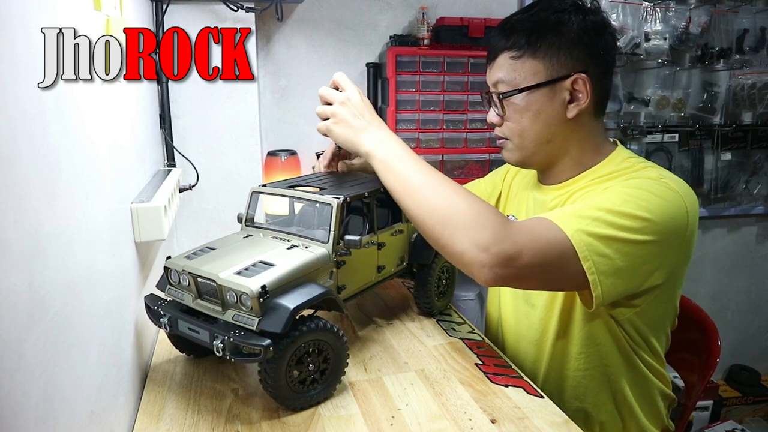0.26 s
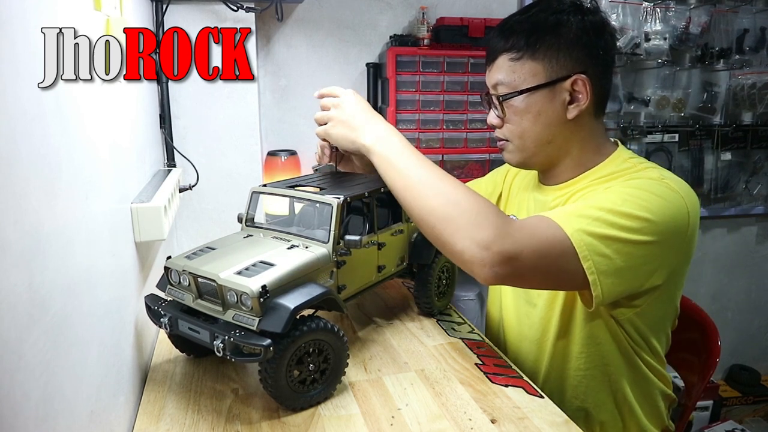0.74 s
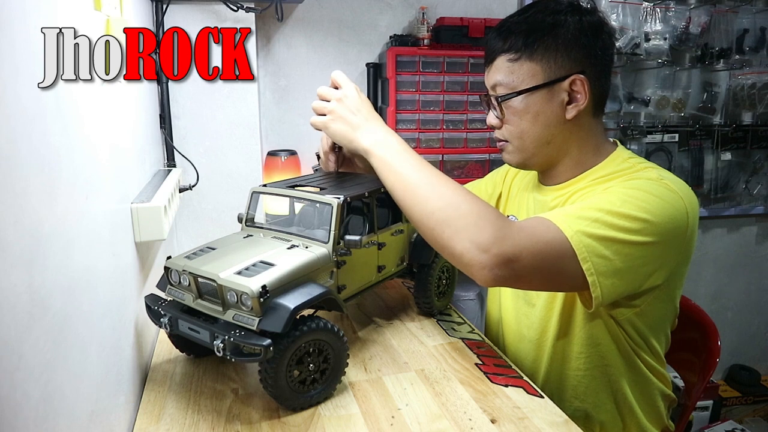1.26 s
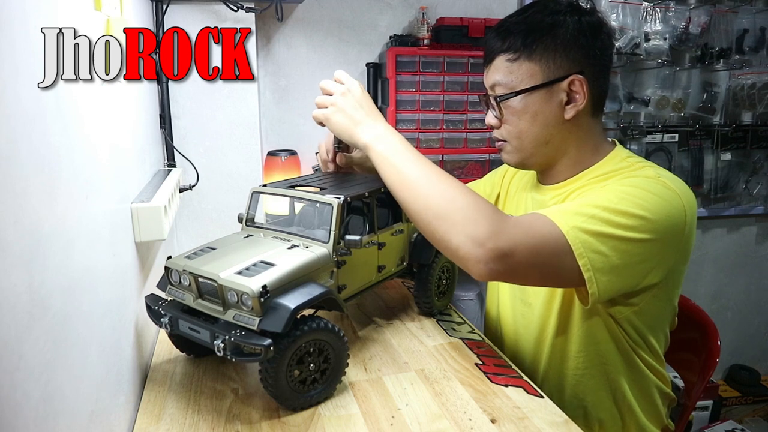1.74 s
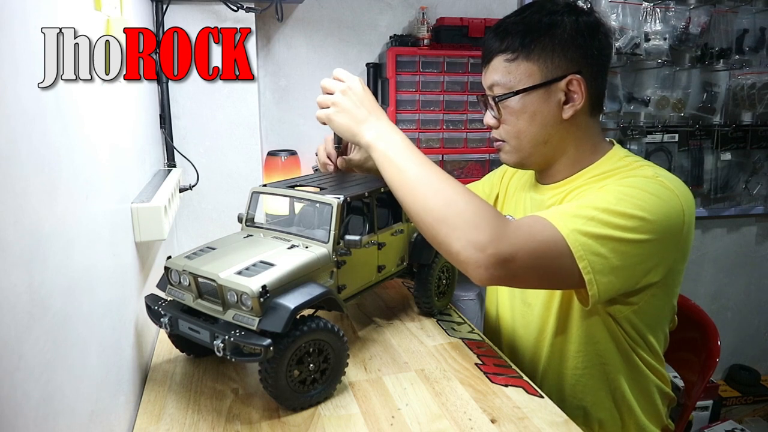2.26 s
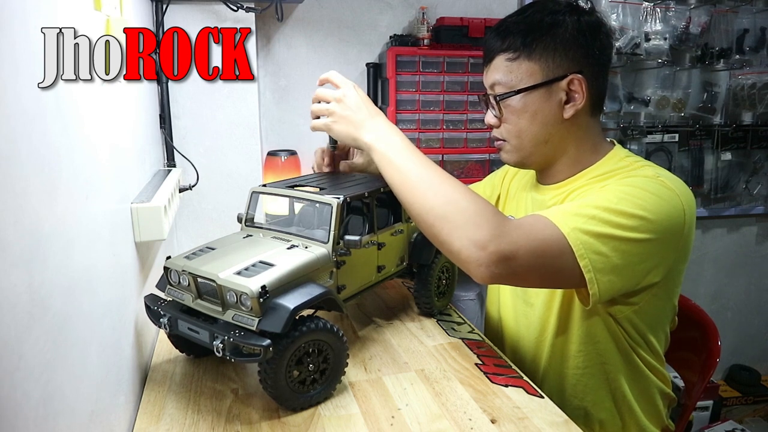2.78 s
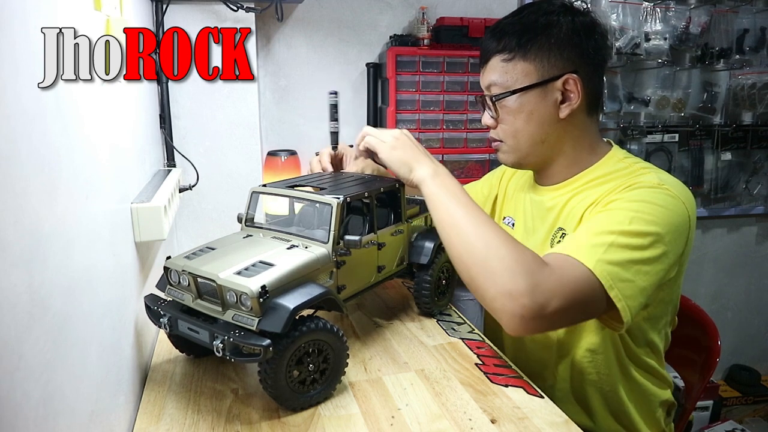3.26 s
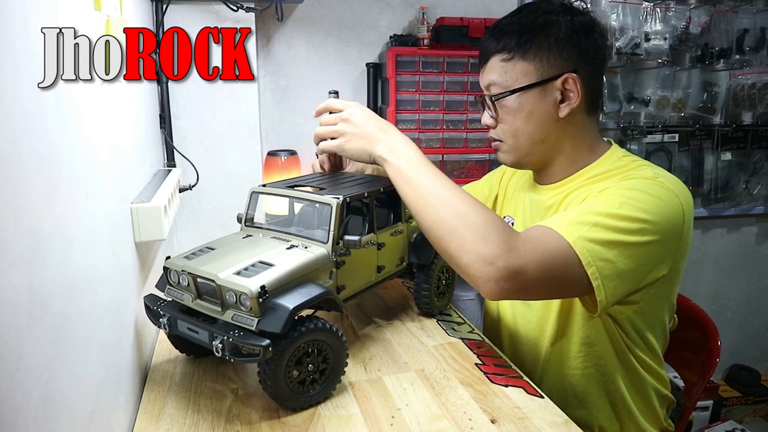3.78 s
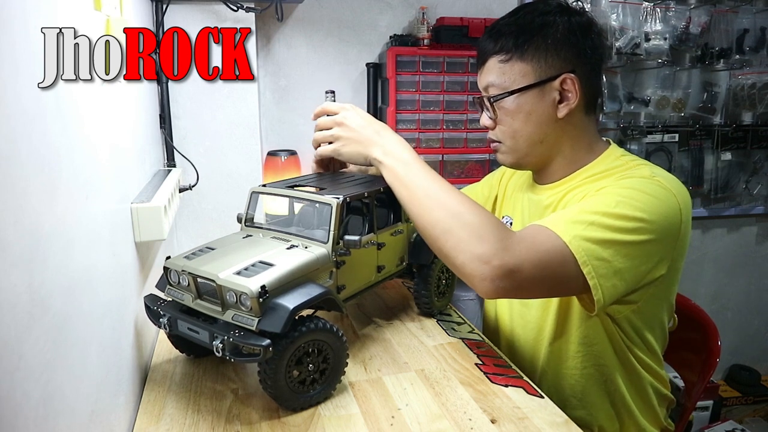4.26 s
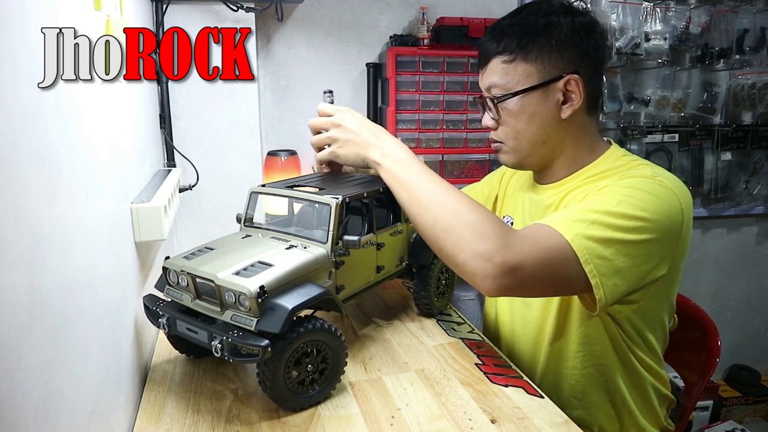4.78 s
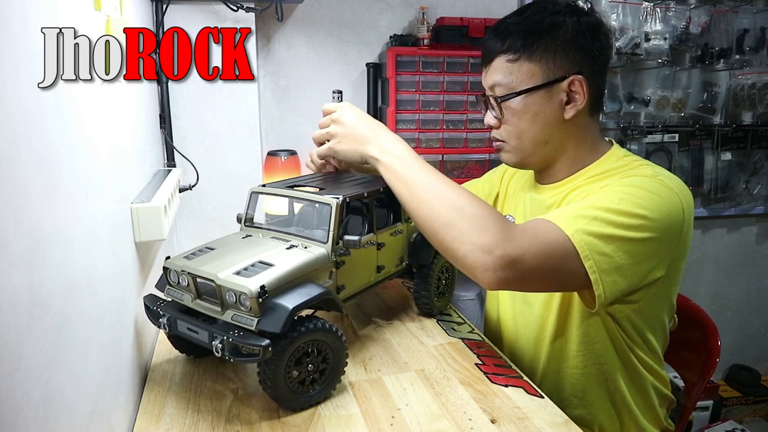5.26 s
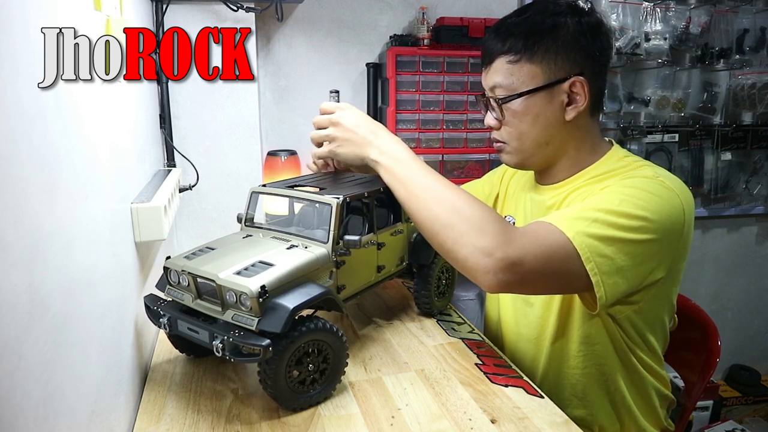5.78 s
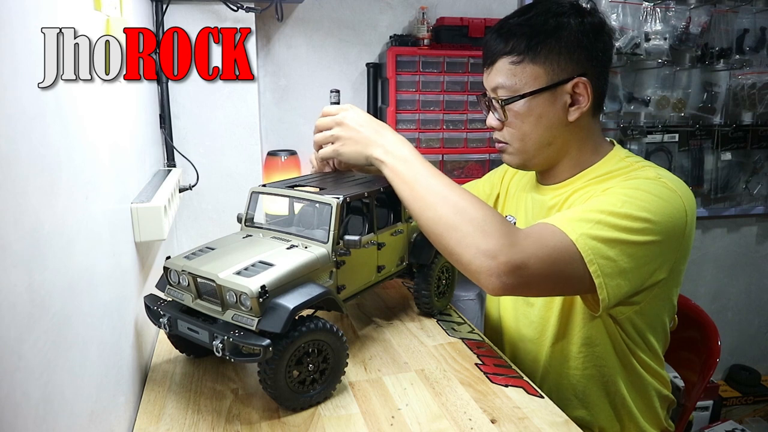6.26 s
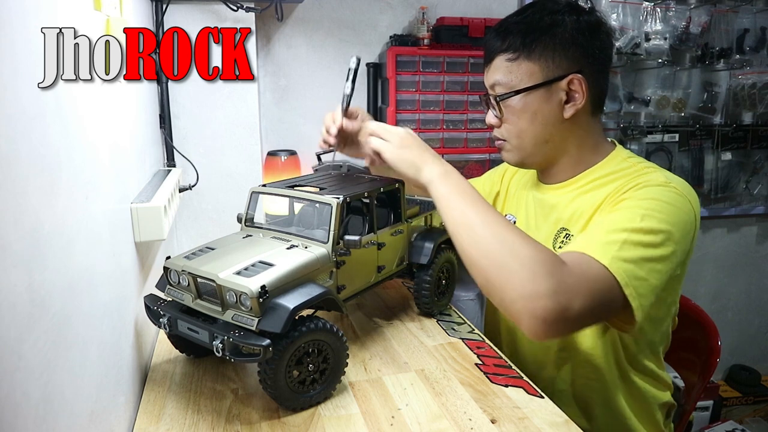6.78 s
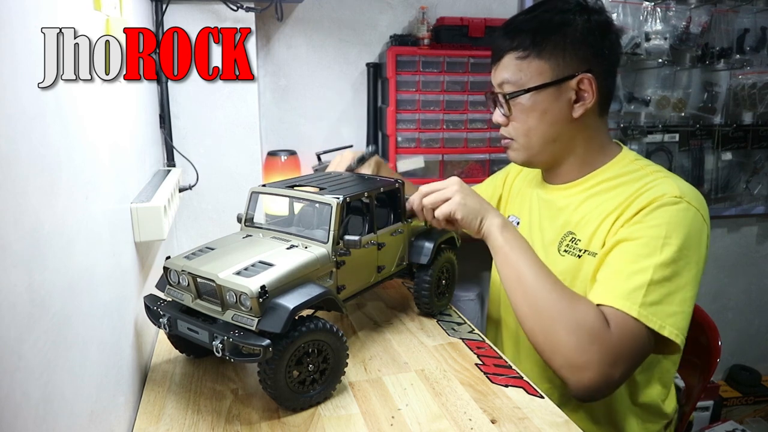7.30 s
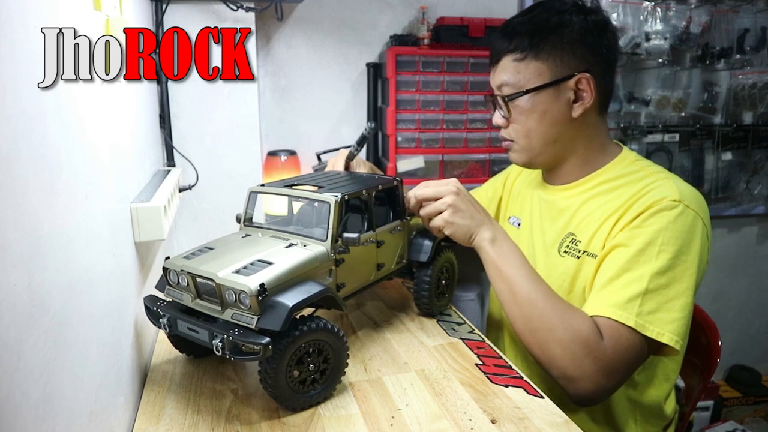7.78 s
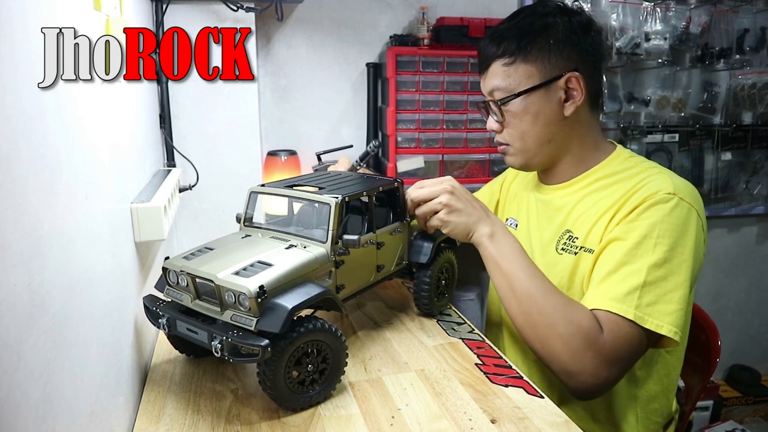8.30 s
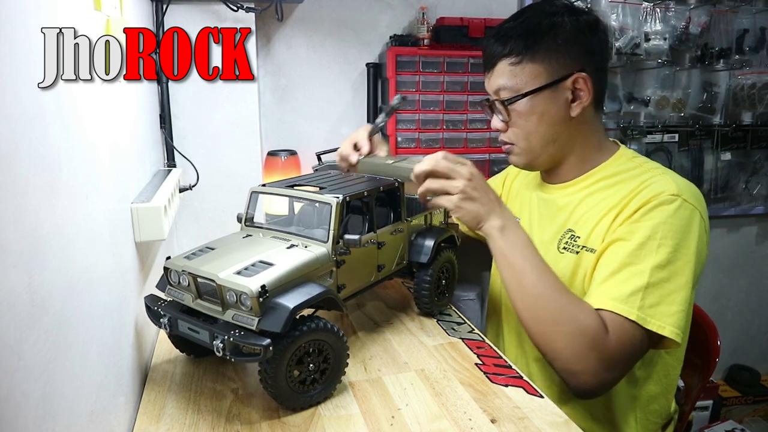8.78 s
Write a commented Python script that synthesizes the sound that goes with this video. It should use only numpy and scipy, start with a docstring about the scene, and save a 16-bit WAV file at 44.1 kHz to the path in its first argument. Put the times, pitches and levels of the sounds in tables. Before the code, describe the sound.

A close stereo microphone in a small workshop hears a screwdriver working on a hollow plastic model car, over faint low air rumble and wavering hum. A snap comes at 0.3 seconds, a stronger crack at 0.8, with slight rubs and taps until another snap at 2.1. A tight cluster of cracks bursts at 2.7, softer ones at 3.3, then a dry pair at 4.2. Faint steel ticks and hollow knocks lead to the loudest snap at 5.5, sharp and bright with a brief panel buzz. Another hard crack lands at 6.0, followed by weaker snaps at 6.1 and 6.5 and tiny ticks until 6.7. At 7.1 a hand bumps the car dully. A thin metal bracket clinks and scrapes around 7.6, lightly at 8.0, and sharply again at 8.4, with one faint touch near 8.9. Fingers rustle softly throughout; reflections are short.

```python
"""A small screwdriver works screws out of the plastic shell of a model car: friction grinds, then a snap and crack.
The bit ticks on screw heads and a light metal bracket clinks and slides: blows that set decaying modes ringing.
The shell knocks hollowly, fingers tap, rub and rustle as filtered noise, and a hand bumps the car.
Behind, a small room reflects it all over shaped air noise and a wavering hum; a limiter ducks after the
hardest snaps."""
import sys
import numpy as np
from scipy import signal
from scipy.fft import rfft, irfft, next_fast_len
from scipy.io import wavfile

SR = 44100
rng = np.random.default_rng(int(sys.argv[2]) if len(sys.argv) > 2 else 0)


def materialize(psi):
    """Save the field psi as 16-bit PCM at rate SR to the path in sys.argv[1].

    A 1-D psi becomes a single channel; in a 2-D psi each row is a channel.
    """
    bounded = np.clip(np.atleast_2d(psi).T, -1, 1)
    quanta = np.round(bounded * 32767).astype(np.int16)
    wavfile.write(sys.argv[1], SR, quanta)


N = 398653
EVENT_S = np.arange(SR // 2) / SR  # time axis of one event


def amp(db):
    """Decibels to gain."""
    return 10 ** (np.asarray(db) / 20)


def add(mix, s, sound):
    """Mixes a sound in at a time, cut at the end of the mix."""
    part = mix[..., round(s * SR):][..., :sound.shape[-1]]
    part += sound[..., :part.shape[-1]]


# Screws snapping loose. Each row: time in s, level in dB, treble against middle in dB, strongest body mode in Hz,
# struck panel's ring in Hz, tip crack in dB, grinding before the snap in s, final grinding level in dB,
# roof buzz in dB. Levels are before the mix gains, here and below.
SNAPS = [(0.266, -18, -12, 490, 3160, -35, 0.01, -23, -44.5),
         (0.7843, -25, -6.5, 493, 1890, -31, 0.003, -38, -54),
         (0.792, -15.5, -12, 360, 1760, -28.5, 0.004, -30, -50),
         (2.081, -24.5, -6, 610, 1500, -34, 0.0054, -41, -46),
         (2.671, -20.5, -17.5, 580, 1970, -38, 0.026, -31, -46.5),
         (2.708, -20.5, -8.5, 450, 2900, -27, 0.012, -32.5, -41.5),
         (2.769, -14, -5, 546, 3380, -20, 0.042, -26, -36.5),
         (3.296, -29.5, -1.5, 577, 1640, -37.5, 0.03, -38, -44),
         (3.358, -33, -13.5, 766, 1510, -61, 0.024, -44, -58),
         (4.223, -20, -15.5, 635, 2530, -38, 0.029, -37.5, -48),
         (4.246, -23.5, -14, 613, 2350, -45, 0.0082, -44, -43.5),
         (5.475, -31, -6, 610, 3050, -42, 0.033, -29, -43),
         (5.512, -3, -5, 710, 2910, -8, 0.031, -23.5, -26.5),
         (5.967, -28, -10.5, 541, 3260, -54, 0.025, -34.5, -48),
         (6.034, -11.5, -6, 630, 2460, -13.5, 0.044, -25, -28),
         (6.144, -19, -7, 574, 2220, -28.5, 0.034, -38, -39),
         (6.51, -24, -15, 526, 3200, -37.5, 0.13, -41.5, -42)]
# Loose roof panel. Each row: nominal mode in Hz, relative level in dB, t60 in s.
ROOF = [(2310, 1, 0.33), (2430, -7, 0.22), (3090, -5, 0.2), (4260, -10.5, 0.24), (4580, -9.5, 0.19),
        (6870, -15.5, 0.23)]
REBOUND_S, REBOUND_DB = 0.009, -8.5


def snaps(lead_s=0.0004, crack_room_db=-6, detune=0.012):
    """Screws break loose: the tip cracks and bounces once; the roof buzzes on, each mode's pitch varied at random."""
    out = np.zeros((2, N))
    for s, db, treble_db, body_hz, panel_hz, crack_db, _, _, roof_db in SNAPS:
        tone = hardness(db)[0], treble_db, panel_hz, body_hz
        snap = strike(db, *tone)
        add(snap, REBOUND_S, strike(db + REBOUND_DB, *tone))
        roof = [(hz * (1 + detune * rng.standard_normal()), level_db, t60_s) for hz, level_db, t60_s in ROOF]
        buzz = ring(roof, spread_db=3, flutter=1.6, flutter_s=0.0065)
        buzz = buzz * (1 - np.exp(-EVENT_S / 0.0055))
        beam_db = np.interp(db, [-25, -5], [3, 9])
        add(out, s - lead_s, beamed(snap, panel_hz, beam_db))
        add(out, s - lead_s, amp([[crack_db], [crack_db + crack_room_db]]) * crack())
        add(out, s, amp(roof_db) * buzz / attack(buzz))
    return out


CRACK_HZ, CRACK_WIDTH_HZ, CRACK_T60_S = 4845, 790, 0.025


def crack(rise_s=0.001):
    """The steel tip slips in the screw head: a short noise burst through one narrow, bright resonance."""
    burst = rng.choice([-1., 1.], len(EVENT_S)) * (1 - np.exp(-EVENT_S / rise_s))
    burst = burst * amp(-60 * EVENT_S / CRACK_T60_S)
    bite = colour(burst, hump(bins(burst), CRACK_HZ, CRACK_WIDTH_HZ))
    return bite / attack(bite)


# Blow strength to tone. Each row: level in dB, bass against middle in dB, treble against middle in dB.
HARDNESS = [(-55.5, 9.5, -17.5), (-37.5, 1.5, -16), (-17.5, -7.5, -4.5), (-3.5, -11.5, -8)]


def hardness(db):
    """A harder blow has a shorter contact, so less bass and, mostly, more treble."""
    level_db, bass_db, treble_db = np.transpose(HARDNESS)
    return np.interp(db, level_db, bass_db), np.interp(db, level_db, treble_db)


def strike(out_db, bass_db, treble_db, panel_hz, body_hz):
    """One hit on plastic; hard hits rise faster and ring the panel more."""
    rise_s = np.interp(out_db, [-50, -20], [.002, .0007])
    panel_db = np.interp(out_db, [-22, -4], [6, 15])
    return amp(out_db) * blow(bass_db, treble_db, panel_hz, body_hz, rise_s=rise_s, panel_db=panel_db)


RATTLE_HZ, RATTLE_WIDTH_HZ, RATTLE_PEAK_DB = 2335, 220, 5  # loose roof panel


def blow(bass_db, treble_db, panel_hz, body_hz=580, chatter_db=6, chatter_s=0.011, rise_s=0.00071,
         panel_db=7, body_db=7, rattle_db=-1, rattle_t60_s=.07):
    """Contact chatters for milliseconds in the modes nearest the struck spot; the whole shell rattles on briefly."""
    force = rng.choice([-1., 1.], len(EVENT_S)) * (1 - np.exp(-EVENT_S / rise_s))
    hz = bins(force)
    panel = hump(hz, panel_hz, width_hz=480)
    body = hump(hz, body_hz, width_hz=220)
    chatter_gain = amp(chatter_db + panel_db * panel + body_db * body)
    chatter = colour(force * np.exp(-(EVENT_S / chatter_s) ** 2), chatter_gain)
    rattle_gain = amp(RATTLE_PEAK_DB * hump(hz, RATTLE_HZ, RATTLE_WIDTH_HZ))
    rattle = colour(force * amp(rattle_db - 60 * EVENT_S / rattle_t60_s), rattle_gain)
    return voiced(colour(chatter + rattle, shell_gain(hz)), bass_db, treble_db)


# Main shell resonances. Each row: centre in Hz, width in Hz, relative level in dB.
SHELL = [(387.8, 66, -6.5), (410, 27, -13), (568.4, 52, -6), (765.6, 31, -5.5), (978.6, 60, -13.5),
         (1442, 73, -7), (1730, 120, -7), (1870, 140, -14), (2284, 21, -5), (2400, 20, -20.5),
         (2750, 54, -8), (3164, 200, -4), (3040, 52, -7), (4440, 820, -10), (5470, 310, -13.5),
         (6820, 470, -12.5)]
# Dense lesser shell modes. Each row: frequency in Hz, relative level in dB.
PLASTIC = [(60, -34), (220, -16), (320, -9.5), (600, -4), (850, -10), (1150, -10), (1700, 5), (2950, 0),
           (3900, -1), (5200, 0), (7000, -5), (9500, -10.5), (11500, -24), (16000, -13)]


def shell_gain(hz, modes_db=5, dense_db=-7.0):
    """Main resonances over dense lesser modes; so small a shell radiates little deep bass."""
    peaks = sum(amp(db + modes_db) ** 2 * hump(hz, f, width_hz) for f, width_hz, db in SHELL)
    return np.sqrt(amp(read(PLASTIC, hz) + dense_db) ** 2 + peaks * (1 - np.exp(-(hz / 330) ** 4)))


# Bracket sliding on the body. Each row: start in s, end in s, level in dB, treble against middle in dB.
SLIDES = [(7.651, 7.681, -26.5, -1.5), (8.01, 8.074, -36, -23), (8.303, 8.355, -54.5, -4),
          (8.418, 8.515, -43.5, -8), (8.863, 8.901, -59, 1.5)]
# Fingers and tool rubbing the shell. Each row: start in s, end in s, start level in dB, end level in dB,
# treble against middle in dB, pitch favoured at that spot in Hz.
RUBS = [(0.238, 0.258, -42, -43, -12, 1986), (1.263, 1.292, -48, -58, -14, 1710),
        (1.72, 1.732, -45, -42, -6, 1800), (1.75, 1.8, -54, -67, -10, 2100),
        (3.472, 3.497, -46, -52, -14, 1680), (3.518, 3.591, -53.5, -50, -19, 1700),
        (4.113, 4.172, -48.5, -35, -10.5, 1730), (4.172, 4.205, -33, -46, -9, 1730),
        (4.8, 4.85, -46, -55, -17, 2120), (6.448, 6.48, -45, -45, -7, 4300),
        (6.694, 6.722, -48, -41.5, 6, 3000), (7.012, 7.104, -48.5, -56, -7.5, 4830),
        (7.478, 7.505, -47, -45.5, -18, 2270), (7.638, 7.652, -41, -28, -11, 2290),
        (8.19, 8.21, -42.5, -40.5, -17, 4400), (8.405, 8.5, -35.5, -40, -17, 2080)]
GRIND_SWELL_DB, GRIND_BRIGHT_DB = 8.5, 1  # brightness against the snap that follows
GRIND_HZ, SLIDE_HZ = 3130, 2860


def scrapes():
    """The thread grinds harder until each snap, fingers and tool rub the shell, and the bracket slides off its seat."""
    grinds = [(s - length_s, s, db - GRIND_SWELL_DB, db, treble_db + GRIND_BRIGHT_DB, GRIND_HZ)
              for s, _, treble_db, *_, length_s, db, _ in SNAPS]
    slides = [(start, end, db, db, treble_db, SLIDE_HZ) for start, end, db, treble_db in SLIDES]
    return (friction(grinds, shell_gain, bass_db=-3.0, spot_db=6)
            + friction(RUBS, shell_gain, bass_db=-3.0, spot_db=9)
            + friction(slides, bracket_gain, bass_db=-3.0, spot_db=0.0))


def friction(rows, body_gain, bass_db, spot_db, slips_per_s=450, uneven_db=5, hiss=0.17,
             clump_db=2.0, clump_s=0.0051):
    """Tiny random slips, swelling in clumps over hiss, drive a body under a force that ramps in dB."""
    out = np.zeros(N)
    for start, end, start_db, end_db, treble_db, spot_hz in rows:
        size = int(np.clip(round((end - start) * SR), 64, len(EVENT_S)))
        chance = rng.random(len(EVENT_S))
        heft = rng.exponential(1, len(EVENT_S))
        fizz = rng.standard_normal(len(EVENT_S))
        slips = (chance < slips_per_s / SR) * amp(uneven_db * np.minimum(heft, 2)) * np.sign(fizz)
        drive = evened(amp(clump_db * wander(size, clump_s)) * (slips + hiss * fizz)[:size])
        force = amp(np.linspace(start_db, end_db, size)) * (1 - np.exp(-EVENT_S[:size] / 0.0041))
        drive = np.pad(drive * force, (0, len(EVENT_S) - size))
        hz = bins(drive)
        gain = body_gain(hz) * amp(spot_db * hump(hz, spot_hz, width_hz=170))
        grind = voiced(colour(drive, gain), bass_db, treble_db, size=size)
        add(out, start, attack(force, size=size) * grind)
    return out


# Knocks on the bracket. Each row: time in s, level in dB, bass against middle in dB, favoured pitch in Hz,
# ring against the row level in dB, place from face 0 to edge 1.
CLINKS = [(7.563, -41.5, 11.5, 2280, 2, 0), (7.653, -22.5, -3, 2300, 1.5, 0),
          (7.667, -27.5, -1, 2820, 5, 0.13), (7.685, -12, -12.5, 2830, -7, 0.92),
          (7.931, -45, 1.5, 4500, -10.5, 0.78), (8.025, -42.5, -3, 2250, 4, 0.59),
          (8.047, -33, 2.5, 5350, -1, 0.23), (8.319, -51, -16, 4100, 9, 0.17),
          (8.359, -35.5, -10, 8800, 7, 0), (8.376, -16, -2.5, 2000, -7.5, 0.26),
          (8.39, -14, -14, 4150, -26, 0.2), (8.476, -29.5, -9, 4120, -2, 0.0027),
          (8.888, -50.5, -18.5, 2900, 3.5, 0.18)]
# Bracket modes. Each row: frequency in Hz, relative level struck on the face in dB, on the edge in dB, t60 in s.
BRACKET = [(2296, -2, -4, 0.19), (2820, -1, -8, 0.11), (3110, -12, -9, 0.22), (3801, -7, 3.5, 0.21),
           (4100, -3, -12, 0.13), (4515, -9, -0.5, 0.17), (5292, -3, 0, 0.14), (6280, -8, 4, 0.085),
           (6830, -8, -20, 0.11), (7115, -12, -18, 0.12), (7525, -6, -5, 0.11), (8700, -4, -14, 0.07),
           (8990, -7, -10, 0.1), (9620, -15, -19, 0.1), (10900, -14, -20, 0.08), (14300, -11, -17, 0.06)]


def clinks():
    """The bracket knocks on its seat, each time at its own place between face and edge; the next chokes the ring."""
    out = np.zeros((2, N))
    next_s = [row[0] for row in CLINKS[1:]] + [N / SR]
    for (s, db, bass_db, spot_hz, ring_db, edge), until in zip(CLINKS, next_s):
        modes = [(hz, np.interp(edge, [0, 1], [face_db, edge_db]), t60_s)
                 for hz, face_db, edge_db, t60_s in BRACKET]
        clink = metal(modes, bass_db, spot_hz, ring_db, blow_db=-2.5, bright_db=-10.0, free_s=until - s)
        add(out, s, amp(db) * clink)
    return out


def bracket_gain(hz, modes_db=13, damped_hz=45):
    """The bracket's modes, broadened by contact damping, stand out over the shell."""
    peaks = sum(amp(db + modes_db) ** 2 * hump(hz, f, damped_hz) for f, db, _, _ in BRACKET)
    return np.sqrt(peaks + shell_gain(hz) ** 2)


SPOT_HZ, SPOT_DB_PER_OCTAVE = 3010, 1.5  # a metal blow brightens with its spot's pitch


def metal(modes, bass_db, spot_hz, ring_db, blow_db, bright_db, free_s, favour_db=7, choke_db=6):
    """A blow rings a metal part, most near the spot's pitch, until contact chokes it after free_s."""
    struck = [(hz, level_db + favour_db * hump(hz, spot_hz, width_hz=500), t60_s)
              for hz, level_db, t60_s in modes]
    tone = ring(struck, spread_db=1.0, flutter=0.69, flutter_s=0.01) * (1 - np.exp(-EVENT_S / 0.0017))
    tone = tone * amp(-choke_db * np.clip((EVENT_S - free_s) / 0.006, 0, 1))
    treble_db = bright_db + SPOT_DB_PER_OCTAVE * np.log2(spot_hz / SPOT_HZ)
    knock = blow(bass_db, treble_db, spot_hz, chatter_s=0.01, panel_db=16.5)
    return amp(blow_db) * beamed(knock, spot_hz, beam_db=12.5) + amp(ring_db) * tone / attack(tone)


# Bit touching a screw head. Each row: time in s, level in dB, bass against middle in dB, favoured pitch in Hz,
# ring against the row level in dB.
TICKS = [(3.819, -43, 3, 6370, -2), (4.047, -55, 8, 5430, -18), (4.209, -37.5, -5, 6360, -10),
         (4.734, -44, 0, 3840, -28), (5.672, -45, -9, 6300, -6), (5.91, -51.5, -1, 6400, -3.5),
         (6.316, -46, 2.5, 6980, -2.5), (6.617, -47, -6, 6400, -5), (6.661, -46, -4, 3080, -2),
         (6.698, -40, -8, 7030, 3)]
# Bit modes. Each row: frequency in Hz, relative level in dB, t60 in s.
BIT = [(2202, -11, 0.17), (3200, -14, 0.15), (4377, -6, 0.11), (5346, -18.5, 0.11), (6430, -7.5, 0.083),
       (6800, -10.5, 0.2), (7520, -5, 0.11), (8888, -13, 0.1), (9250, -9, 0.11), (10470, -7, 0.081),
       (12600, -8, 0.08), (14000, -4, 0.072)]


def ticks():
    """The bit touches a screw head and rings faintly, unchoked."""
    out = np.zeros((2, N))
    for s, db, bass_db, spot_hz, ring_db in TICKS:
        tick = metal(BIT, bass_db, spot_hz, ring_db, blow_db=-2.0, bright_db=-0.5, free_s=N / SR)
        add(out, s, amp(db) * tick)
    return out


# Shell shifting under the tool. Each row: time in s, level in dB, strongest body mode in Hz.
KNOCKS = [(1.347, -47, 600), (1.362, -43, 770), (1.732, -30.5, 790), (2.317, -48, 700), (2.326, -42.5, 620),
          (2.606, -48, 615), (2.841, -32, 700), (2.87, -51, 752), (3.337, -38.5, 810), (4.224, -27, 700),
          (4.758, -47.5, 750), (4.794, -41, 615), (4.985, -54, 569), (5.059, -51.5, 570),
          (5.072, -59.5, 605), (5.677, -43.5, 542), (6.714, -44, 783), (7.362, -37.5, 735),
          (7.556, -32, 540), (7.932, -36.5, 514)]
# Shaft and fingertips on the roof. Each row: time in s, level in dB.
TAPS = [(0.13, -52), (0.324, -38), (2.269, -50), (2.693, -26.5), (3.008, -52), (3.073, -51.5),
        (3.37, -38.5), (3.436, -43), (4.959, -51), (5.422, -44), (5.999, -31), (6.017, -23.5), (7.28, -55),
        (7.603, -34.5)]
TAP_BASS_DB, TAP_TREBLE_DB, TAP_PANEL_HZ, TAP_BODY_HZ = -6.5, -10.5, 1744, 369


def knocks(panel_hz=1900, lead_s=0.0008, hollow_db=3.0):
    """The shell knocks with extra bass as it shifts, and is tapped lightly on the roof."""
    out = np.zeros((2, N))
    for s, db, body_hz in KNOCKS:
        bass_db, treble_db = hardness(db)
        knock = strike(db, bass_db + hollow_db, treble_db, panel_hz, body_hz)
        add(out, s - lead_s, beamed(knock, body_hz, beam_db=6))
    for s, db in TAPS:
        add(out, s - lead_s, strike(db, TAP_BASS_DB, TAP_TREBLE_DB, TAP_PANEL_HZ, TAP_BODY_HZ))
    return out


RUSTLES_PER_S, RUSTLE_S, RUSTLE_HZ = 5.5, 0.012, 1500  # length x 0.5-1.5, pitch x 1-2
RUSTLE_DB, RUSTLE_SPREAD_DB, RUSTLE_TREBLE_DB = -57.5, 9, -10  # loudest start, range below it, treble


def rustles():
    """Fingers keep shifting their grip: faint short rubs at random moments."""
    draws = rng.random((round(RUSTLES_PER_S * N / SR), 3))
    rows = []
    for when, length, soft in draws:
        start = when * N / SR
        end = start + RUSTLE_S * (.5 + length)
        start_db = RUSTLE_DB - RUSTLE_SPREAD_DB * soft
        end_db = RUSTLE_DB - RUSTLE_SPREAD_DB
        rows.append((start, end, start_db, end_db, RUSTLE_TREBLE_DB, RUSTLE_HZ * (1 + length)))
    return friction(rows, shell_gain, bass_db=0.0, spot_db=6.0)


# Dull bumps of the hand. Each row: time in s, level in dB.
BUMPS = [(7.1, -33), (7.109, -32)]
# Whole car on its tyres. Each row: mode in Hz, relative level in dB, t60 in s.
CHASSIS = [(160, -2, 0.08), (198.8, 2, 0.07), (244.5, 1, 0.07), (326, 0, 0.06), (419, -1, 0.065),
           (574, -5, 0.05)]


def bumps(rattle_db=-11, soft_hz=300):
    """A soft hand rocks the whole car in its low modes, and loose panels rattle."""
    out = np.zeros(N)
    for s, db in BUMPS:
        thud = ring(CHASSIS, spread_db=3.5) * (1 - np.exp(-EVENT_S / 0.004))
        thud = colour(thud, hump(bins(EVENT_S), 0, 2 * soft_hz))
        add(out, s, amp(db) * (thud / attack(thud) + amp(rattle_db) * blow(1.31, -17.0, 2220)))
    return out


def ring(modes, spread_db, flutter=0.41, flutter_s=0.015):
    """Dying modes with random levels and phases, each fluttering randomly in level and phase."""
    out = np.zeros(len(EVENT_S))
    for hz, db, t60_s in modes:
        size, turn = rng.standard_normal(2)
        waver = 1 + flutter * (wander(len(EVENT_S), flutter_s) + 1j * wander(len(EVENT_S), flutter_s))
        envelope = amp(db + spread_db * size - 60 * EVENT_S / t60_s)
        out += envelope * (waver * np.exp(2j * np.pi * (hz * EVENT_S + turn))).real
    return out


def wander(size, step_s):
    """Random line of about unit size, with a new value every step."""
    knots = np.arange(0, size + 1, max(step_s, .001) * SR)
    return np.interp(np.arange(size), knots, rng.standard_normal(len(EVENT_S))[:len(knots)])


def hump(hz, centre_hz, width_hz):
    """A resonance curve, 1 at its centre."""
    return 1 / (1 + (2 * (hz - centre_hz) / width_hz) ** 2)


def bins(x):
    """Frequencies in Hz of a sound's spectrum."""
    return np.fft.rfftfreq(x.shape[-1], 1 / SR)


def read(points, hz):
    """Reads a table on a log-frequency axis."""
    f, value = np.transpose(points)
    return np.interp(np.log(hz + 1), np.log(f + 1), value)


def evened(x):
    """Scales to an rms of 1."""
    return x / np.sqrt(np.mean(x ** 2) + 1e-20)


def attack(x, size=660):
    """Rms of the first size samples (15 ms by default)."""
    return np.sqrt(np.mean(x[:size] ** 2) + 1e-20)


def colour(x, gain):
    """Minimum-phase filter from a gain per bin."""
    log_gain = np.log(np.maximum(gain, 1e-5))
    phase = -signal.hilbert(np.r_[log_gain, log_gain[-2:0:-1]]).imag[:len(gain)]
    return irfft(rfft(x) * np.exp(log_gain + 1j * phase), len(x))


LOW_HZ, HIGH_HZ = 1100, 4200  # edges of the middle band


def voiced(x, bass_db, treble_db, size=660):
    """Sets bass and treble against the middle band, whose attack is brought to level 1."""
    gains_db = []
    for edge, kind, db in ((LOW_HZ, "low", bass_db), ((LOW_HZ, HIGH_HZ), "band", 0), (HIGH_HZ, "high", treble_db)):
        band = signal.sosfilt(signal.butter(4, edge, kind, fs=SR, output="sos"), x)
        gains_db.append(db - 20 * np.log10(attack(band, size=size)))
    bass, middle, treble = gains_db
    curve = [(LOW_HZ * 0.88, bass), (LOW_HZ * 1.4, middle), (HIGH_HZ * 0.59, middle), (HIGH_HZ * 1.41, treble)]
    return colour(x, amp(read(curve, bins(x))))


def beamed(x, spot_hz, beam_db, beam_width_hz=700):
    """The spot beams its pitch at the microphone, so the room gets less: (straight sound, sound to the room)."""
    return np.array([x, colour(x, amp(-beam_db * hump(bins(x), spot_hz, beam_width_hz)))])


# Phase lead of the left port. Each row: frequency in Hz, lead in radians.
LEAD = [(100, 0), (400, .05), (700, 0.4), (1300, 0.45), (2400, 0), (4400, .6), (7000, 1.3), (9000, 1.6),
        (14000, 2.4)]
# Left over right. Each row: frequency in Hz, difference in dB.
BALANCE = [(250, -0.5), (550, 2.5), (1000, 7), (2000, -2.5), (4500, 2.5), (12000, 0)]


def direct(x):
    """Straight path to the two ports: the left leads in phase, with a level difference per frequency."""
    padded = np.pad(x, (0, next_fast_len(N) - N))
    hz = bins(padded)
    half = amp(read(BALANCE, hz) / 2) * np.exp(.5j * read(LEAD, hz))
    return irfft(rfft(padded) * np.array([half, 1 / half]), len(padded))[:, :N]


# Room decay. Each row: frequency in Hz, t60 in s.
ROOM = [(250, 0.37), (700, 0.23), (2000, 0.32), (4500, 0.29), (9000, 0.27), (15000, 0.05)]


def room(x, build_s=0.0017, count=3):
    """Dense reflections, each band dying at its own speed; their pattern drifts as the arms move."""
    out = np.zeros((2, N))
    for k in range(count):
        noise = rng.standard_normal((2, len(EVENT_S)))
        hz, t, z = signal.stft(noise, SR, nperseg=256)
        decay = amp(-60 * t / read(ROOM, hz)[:, None])
        tail = signal.istft(z * decay, SR, nperseg=256)[1][:, :len(EVENT_S)]
        tail = diffuse(tail) * (1 - np.exp(-(EVENT_S / build_s) ** 2))
        share = np.sqrt(2 / count) * np.cos(np.pi * (np.arange(N) / SR + k / count))
        out += signal.oaconvolve((share * x)[None], tail / np.linalg.norm(tail[0]), axes=1)[:, :N]
    return out


# Stereo width of diffuse sound. Each row: frequency in Hz, side over mid in dB.
WIDTH = [(60, -29.5), (130, -28), (290, -15), (640, -7), (1400, -6), (3100, -4), (7000, 1), (15000, 4)]


def diffuse(pair):
    """Sound from all sides is alike at both ports in the bass and unlike in the treble."""
    mid, side = rfft(pair)
    width = amp(read(WIDTH, bins(pair)))
    ports = np.array([mid + width * side, mid - width * side]) / np.sqrt(1 + width ** 2)
    return irfft(ports, pair.shape[-1])


# Moving air. Each row: frequency in Hz, relative density in dB per Hz.
AIR = [(20, -26.5), (36, -25), (52, -7), (76, -14.5), (140, -7.5), (333, -21), (720, -32), (840, -34.5),
       (950, -35), (2700, -37), (4000, -45.5), (8800, -49.5), (10500, -60.5), (15500, -63)]
AIR_RMS_DB = -47
# Motor hum. Each row: frequency in Hz, nominal rms in dB.
HUM = [(50, -57), (145.3, -55)]


def room_tone(waver=0.28):
    """Low rumble of moving air as shaped noise, with hum sines wavering in level and phase."""
    noise = rng.standard_normal((2, next_fast_len(N)))
    rumble = irfft(rfft(noise) * amp(read(AIR, bins(noise))), noise.shape[1])
    air = evened(diffuse(rumble)[:, :N])
    t, knots = np.arange(N) / SR, np.linspace(0, N / SR, 60)
    hum = 0
    for hz, db in HUM:
        swell, drift = (np.interp(t, knots, v) for v in rng.standard_normal((2, len(knots))))
        level = amp(db) * np.sqrt(2) * (1 + waver * swell)
        hum = hum + level * np.sin(2 * np.pi * hz * t + 2 * waver * drift)
    return amp(AIR_RMS_DB) * air + hum


def scene():
    """The work on the car, heard straight and through the room, over the room tone."""
    straight, around = snaps() + clinks() + ticks() + knocks() + scrapes() + rustles() + bumps()
    return amp(-1.5) * direct(straight) + amp(-10.5) * room(around) + room_tone()


def record(dry, limit_db=2.5, recovery_db_per_s=4.5, smooth_s=.004, edge_hz=15800):
    """A limiter dives on the hardest peaks and recovers slowly; what slips past clips; then a low-pass."""
    over_db = np.maximum(20 * np.log10(abs(dry).max(0) + 1e-9) - limit_db, 0)
    fall_db = np.arange(N) * recovery_db_per_s / SR
    held_db = np.maximum.accumulate(over_db + fall_db) - fall_db
    keep = np.exp(-1 / (smooth_s * SR))
    cut_db = signal.lfilter([1 - keep], [1, -keep], held_db)
    limited = np.clip(dry / amp(cut_db), -1, 1)
    low_pass = signal.firwin(511, edge_hz, window=("kaiser", 9), fs=SR)
    return signal.oaconvolve(limited, low_pass[None], "same")


dry = scene()
out = record(dry)
materialize(out)
```